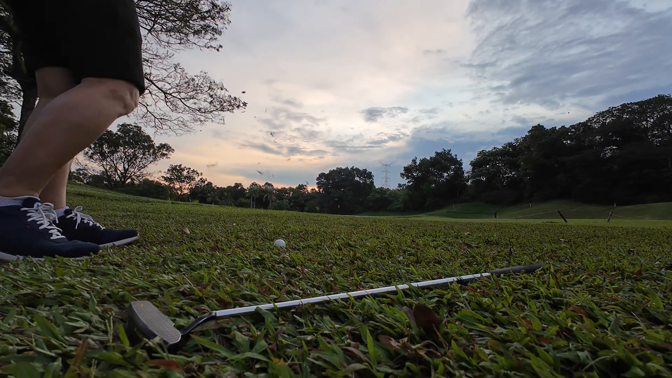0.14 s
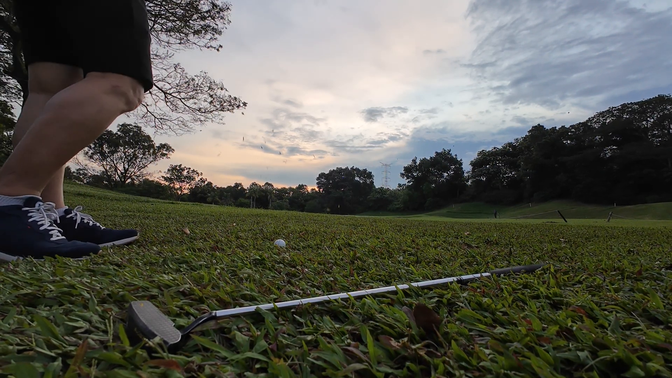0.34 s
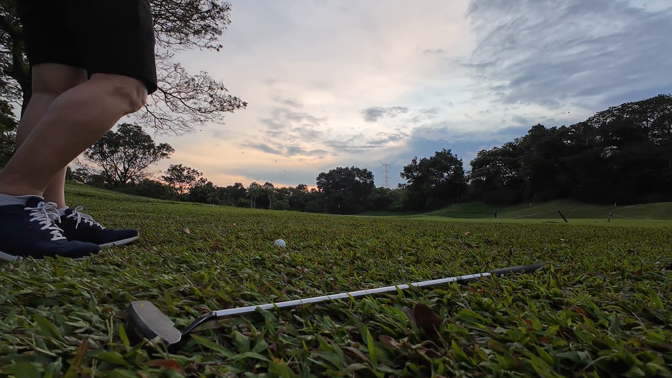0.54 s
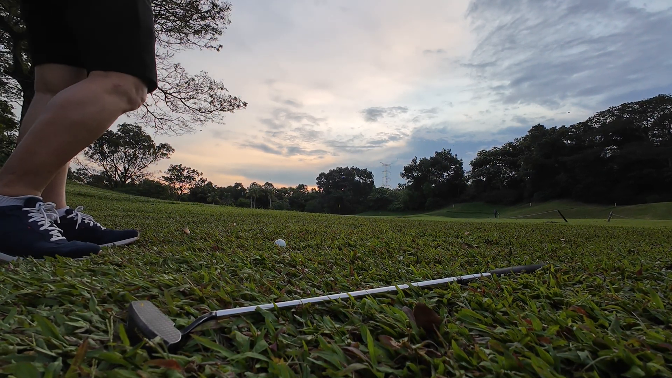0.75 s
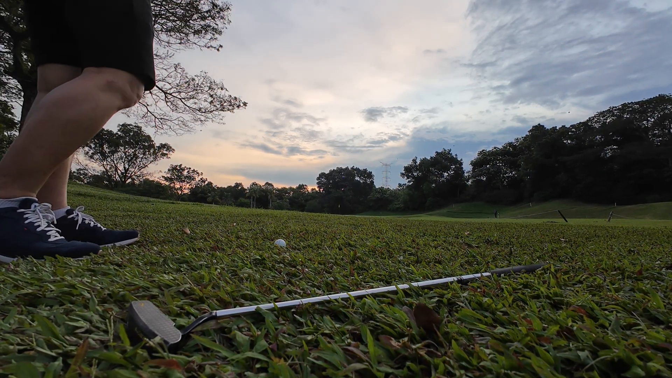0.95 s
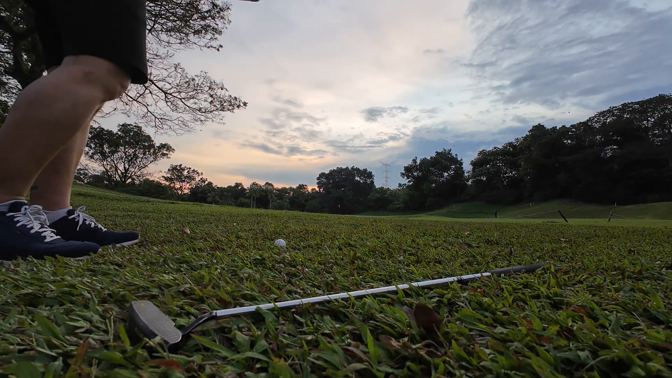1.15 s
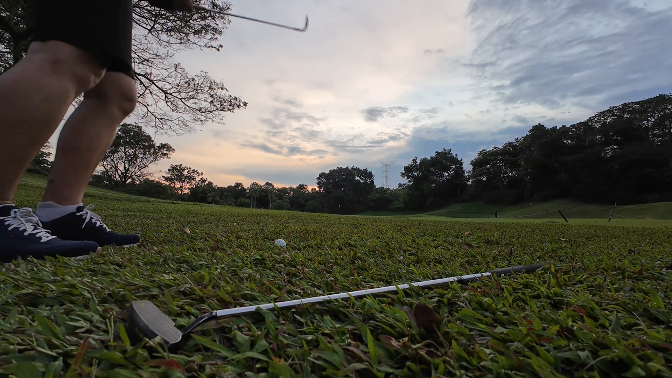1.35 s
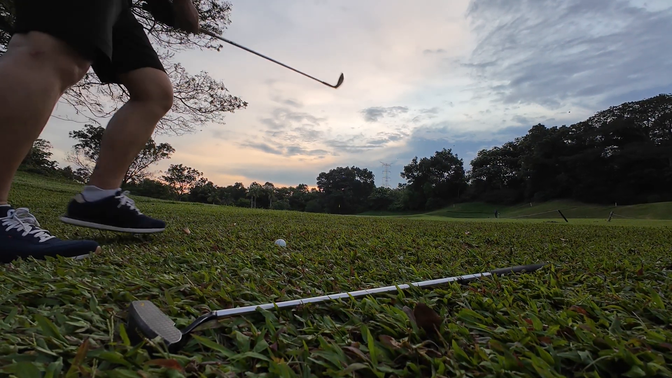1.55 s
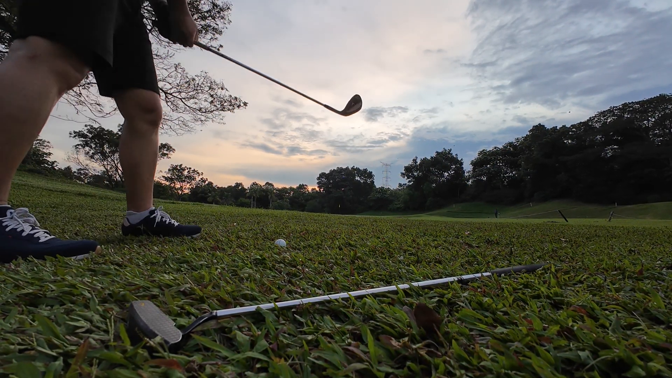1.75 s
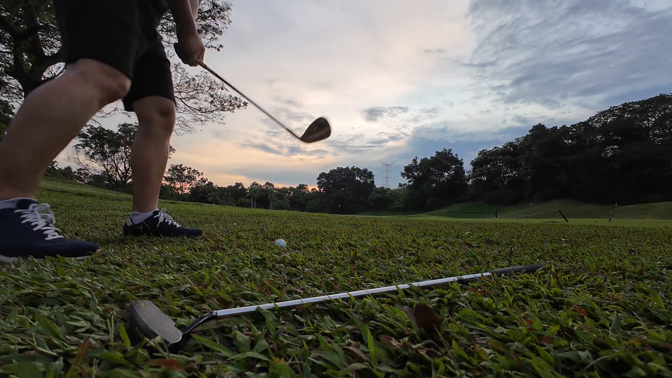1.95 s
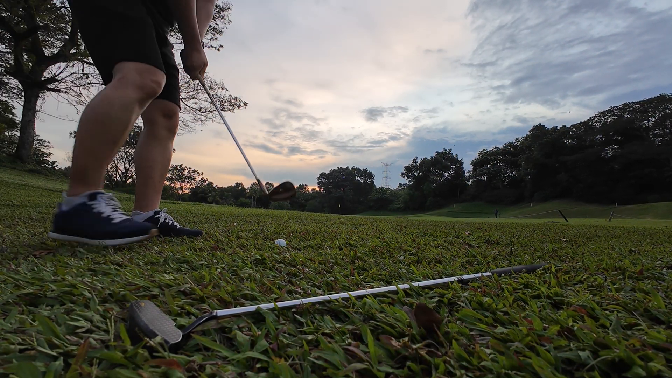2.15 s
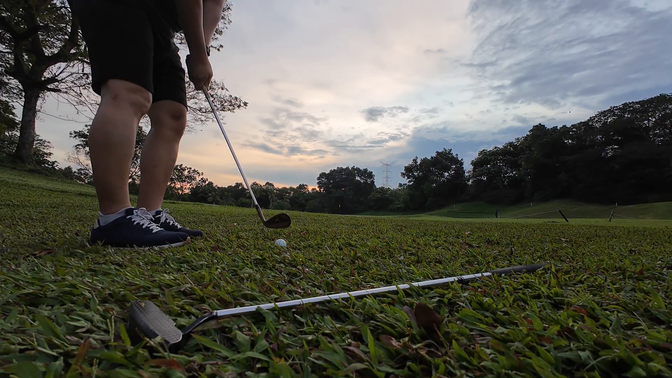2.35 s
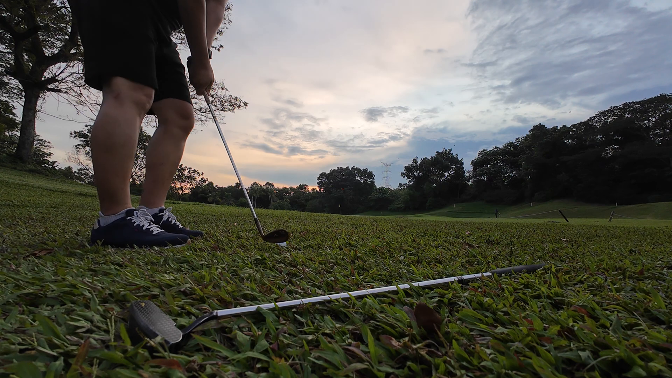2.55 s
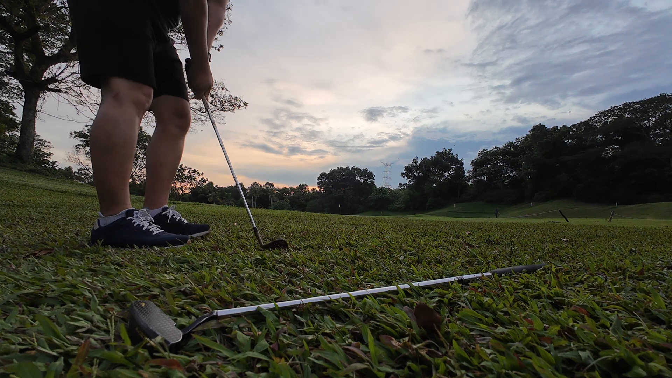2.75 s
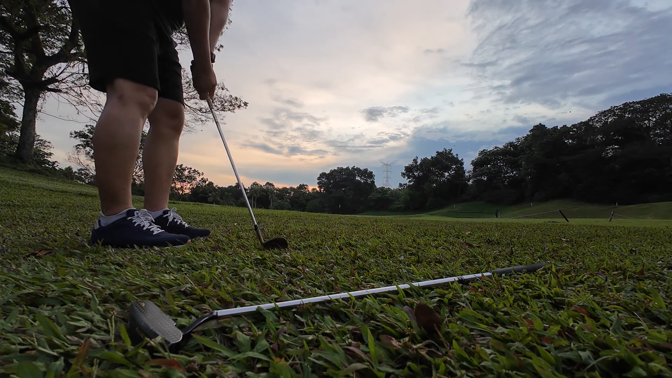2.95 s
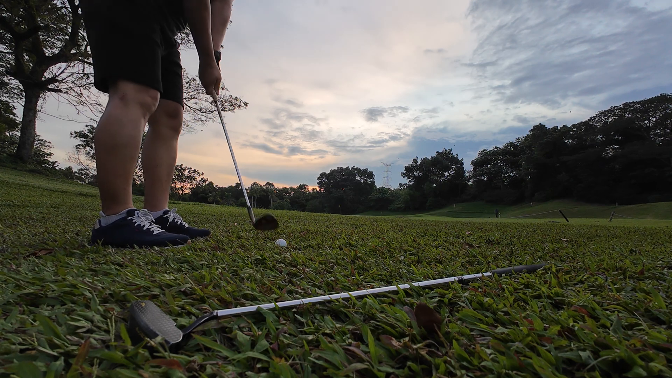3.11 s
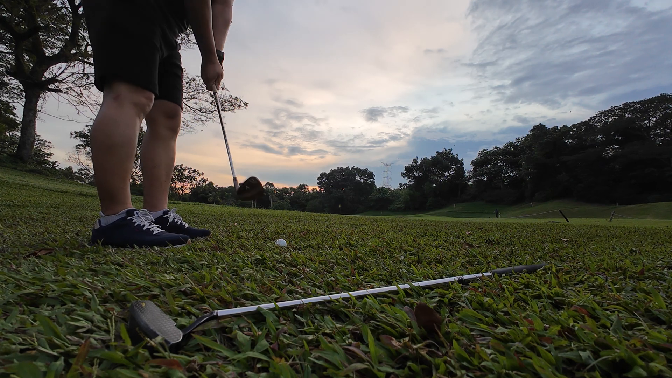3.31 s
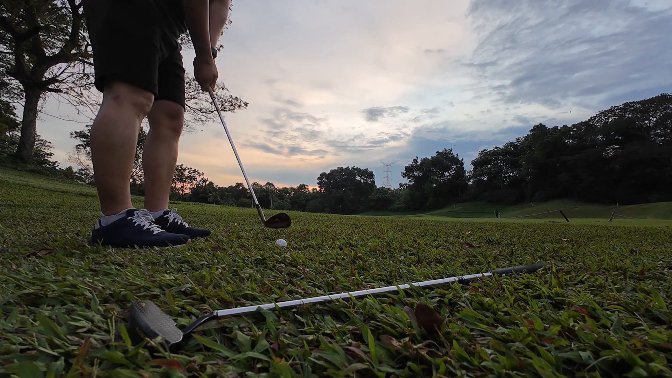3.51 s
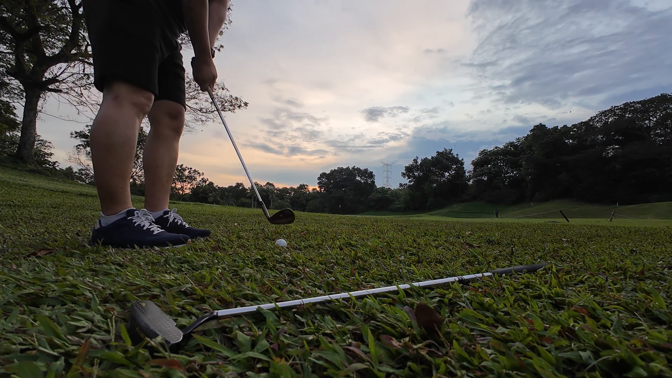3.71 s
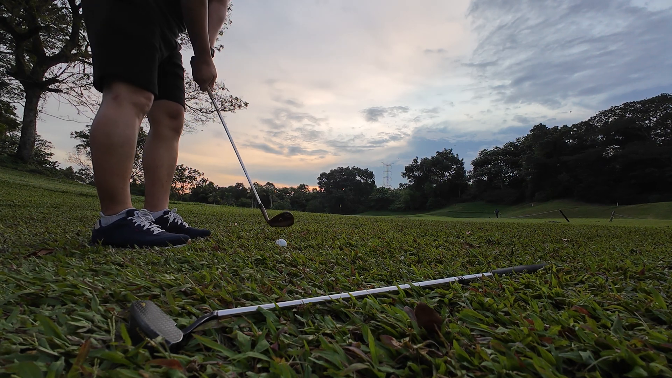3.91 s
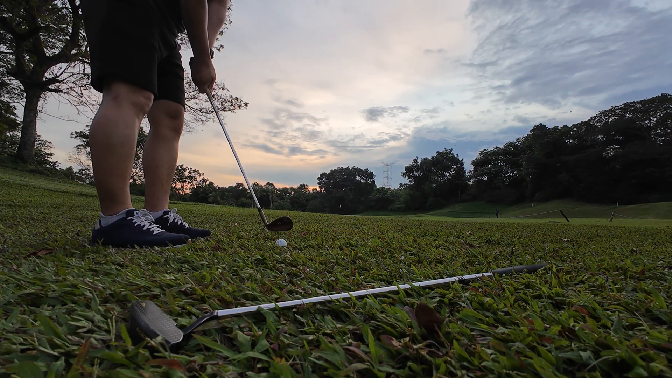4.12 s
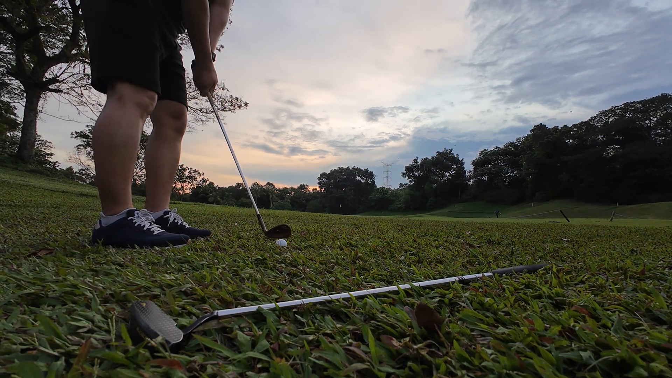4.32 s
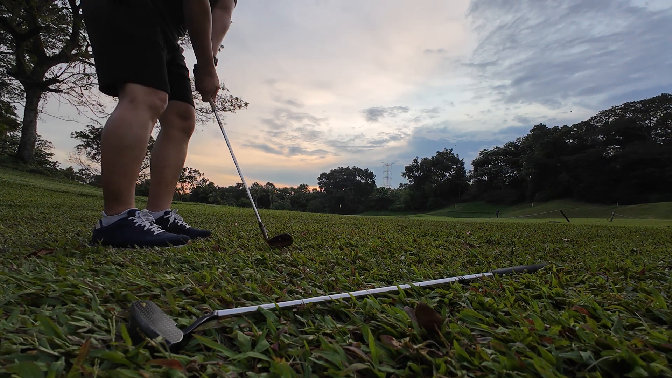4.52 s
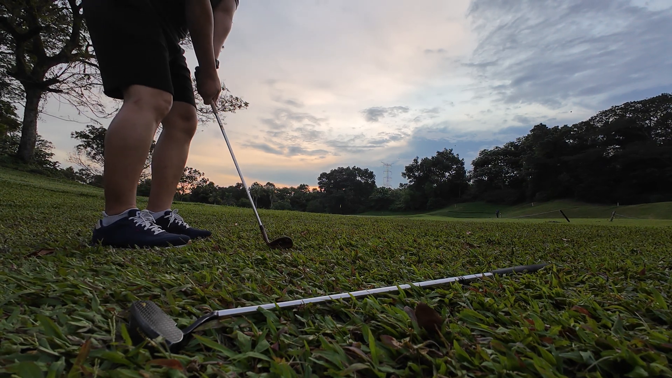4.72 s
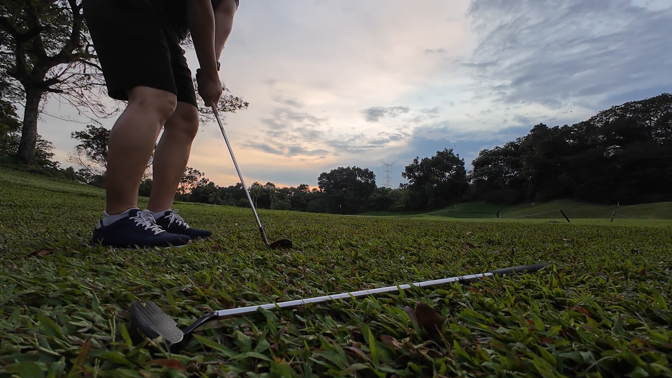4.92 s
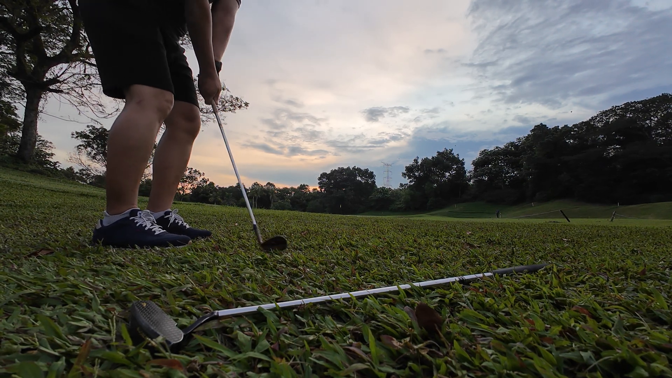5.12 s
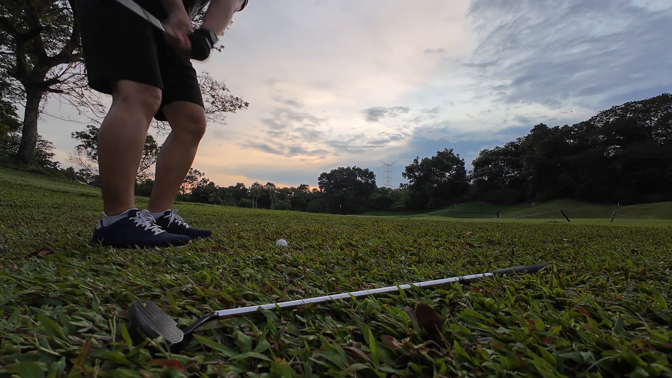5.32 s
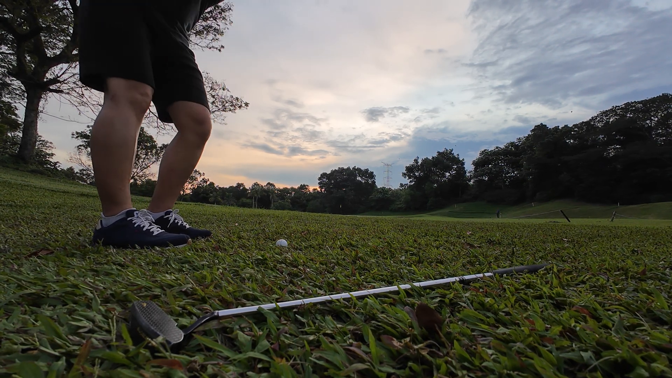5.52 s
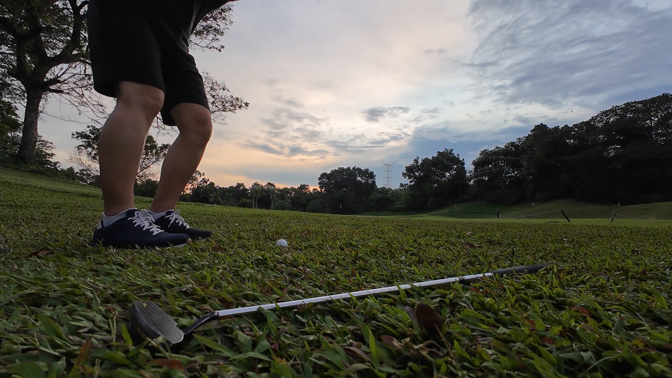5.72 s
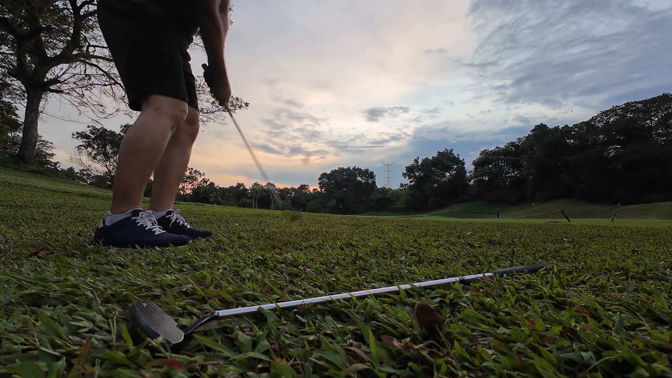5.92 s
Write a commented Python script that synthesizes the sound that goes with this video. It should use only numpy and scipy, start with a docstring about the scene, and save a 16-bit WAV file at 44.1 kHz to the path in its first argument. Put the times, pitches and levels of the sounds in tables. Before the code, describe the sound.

A calm, quiet background of faraway engine hum, high insect hiss and sparse bird whistles, in stereo with birds mostly left. Several muffled steps crunch in grass early on, with tiny stem snaps. After a stretch of birdsong comes a short swish of grass, then almost a second later a sudden club whoosh and hard, dry golf hit, far louder than everything else, with a dull soil thud and brief falling debris.

```python
"""A golfer's iron shot, heard from the grass at dusk: a whoosh, tearing turf, the crack of the ball, flying grass.
The whoosh is a tone and hiss that follow the club's speed; hard blows ring the head; filtered noise makes the turf.
Before it the golfer steps up, grounds the iron and brushes it back: noise bursts for soles, blades and stems.
Birds whistle and chip as gliding tones with an echo from the trees; insects buzz as narrow bands of noise.
Behind them a far engine slowly speeds up, a wavering tone and its octave over a low rumble."""
import sys
import numpy as np
from scipy import signal
from scipy.fft import rfft, irfft, next_fast_len
from scipy.io import wavfile

SR = 44100
rng = np.random.default_rng(int(sys.argv[2]) if len(sys.argv) > 2 else 0)


def output_pcm(signal):
    """Save a mono or channel-first signal as 16-bit PCM at the path in sys.argv[1].

    Samples are clipped to [-1, 1] before scaling.
    """
    pcm = np.clip(np.atleast_2d(signal).T, -1, 1) * 32767
    wavfile.write(sys.argv[1], SR, np.round(pcm).astype(np.int16))


N = 267246
TIME = np.arange(N) / SR   # seconds
CUTOFF_HZ = 15750   # top of the audible band here


def from_db(db):
    """Turn decibels into a gain."""
    return 10 ** (np.asarray(db) / 20)


def rms_one(x):
    """Scale a sound to an average (rms) strength of 1."""
    return x / np.sqrt(np.mean(x ** 2) + 1e-20)


def colour(x, spectrum):
    """Shape a sound by an outline of (pitch_hz, level_db) points, then scale it to rms 1."""
    hz, db = np.transpose(spectrum)
    size = next_fast_len(N)
    log_hz = np.log(np.fft.rfftfreq(size, 1 / SR) + 1)
    # beyond both ends of the outline the level keeps falling
    skirts_db = 20 * np.abs(log_hz - np.clip(log_hz, np.log(hz[0]), np.log(hz[-1])))
    gain = from_db(np.interp(log_hz, np.log(hz), db) - skirts_db)
    return rms_one(irfft(rfft(x, size) * gain, size)[..., :N])


def bandpass(x, low_hz, high_hz):
    """Keep mainly the sound between two pitches."""
    return signal.sosfilt(signal.butter(2, [low_hz, high_hz], "band", fs=SR, output="sos"), x)


def drift(rate):
    """Wander at random with rms 1, through a given number of chance values per second."""
    knots = rng.standard_normal(int(N / SR * rate) + 2)
    return rms_one(np.interp(TIME * rate, np.arange(len(knots)), knots))


def panned(x, pan_db):
    """Make the left louder than the right by pan_db."""
    return x * from_db(np.array([[.5], [-.5]]) * pan_db)


def pair(likeness, pan_db=0):
    """White noise at two microphones: likeness 1 is the same in both, -1 is opposite."""
    mid, side = rng.standard_normal((2, N))
    c = np.clip(likeness, -1, 1)
    both = np.sqrt(1 + c) * mid + np.sqrt(1 - c) * side * [[1], [-1]]
    return panned(both, pan_db) / np.sqrt(2)


def placed(x, pan_db, lead_s):
    """A point source reaches the left microphone lead_s earlier (later if negative)."""
    right = np.interp(TIME - lead_s, TIME, x)
    return panned(np.array([x, right]), pan_db)


def grains(likeness, per_s, spread_db):
    """Noise of uneven strength stands for countless tiny breaks of different sizes."""
    return pair(likeness) * from_db(spread_db * np.clip(drift(per_s), -2, 2))


def burst(start, attack, hold, fall_db_per_s):
    """A loudness that swells, holds, then dies away."""
    age = TIME - start
    return np.clip(age / attack, 0, 1) * from_db(-fall_db_per_s * np.maximum(age - attack - hold, 0))


def traffic(waver_db=2.2, patchy_db=0.6, octave_db=-22, gust_db=0.9):
    """Rumble, exhaust drone and tyre roar from afar, with one engine's firing tone wavering in the air."""
    # noise outlines: pitch_hz, level_db (per Hz, shape only)
    rumble_outline = [(20,-8.5),(40,-9),(65,1.5),(85,-3.5),(110,-9.5),(135,-8.5),(170,-15.5),(260,-40.5)]
    drone_outline = [(120,-7),(170,0.5),(240,-0.5),(330,-4.5),(420,-9.5),(520,-11),(800,-40)]
    roar_outline = [(350,-12),(500,-2),(620,2.5),(790,-5),(1000,-15.5),(1400,-24),(2500,-34)]
    # moments when the traffic surges: peak_s (middle of the swell), rumble_gain_db, roar_gain_db
    surges = [(.85,1,3),(1.35,2,-1.5),(2.27,1,2),(3.571,5,0),(5.19,6,2.5)]
    surge_s = 0.15
    # the engine nears its top firing rate, and fades ever faster as it drives off
    start_hz, top_hz, speedup_s = 106, 137.5, 5.2
    engine_db, fade_db_per_s, gone_s = -38, 1.8, 5.0
    # the drone and the tyre roar recede slowly
    rumble_db, exhaust_db, tyre_db, recede_db_per_s = -41.7, -47, -59.7, 0.45

    hz = top_hz + (start_hz - top_hz) * np.exp(-TIME / speedup_s)
    tone_db = engine_db - fade_db_per_s * TIME - 20 * np.log10(1 + (TIME / gone_s) ** 10)
    receding_db = -recede_db_per_s * TIME
    low_db = rumble_db + gust_db * drift(7)
    roar_db = tyre_db + receding_db
    for s, rumble_gain_db, roar_gain_db in surges:
        swell = np.exp(-((TIME - s) / surge_s) ** 2)
        low_db = low_db + rumble_gain_db * swell
        roar_db = roar_db + roar_gain_db * swell

    phase = 2 * np.pi * np.cumsum(hz + 1.27 * drift(11)) / SR
    engine = np.sin(phase) + from_db(octave_db + 3.55 * drift(5.7)) * np.sin(2 * phase)
    engine = np.sqrt(2) * engine * from_db(tone_db + waver_db * drift(10))
    rumble = from_db(low_db) * colour(pair(0.97), rumble_outline)
    drone_db = exhaust_db + receding_db + patchy_db * drift(12)
    drone = from_db(drone_db) * colour(pair(0.98), drone_outline)
    roar = from_db(roar_db) * colour(pair(0.94), roar_outline)
    return panned(engine + rumble + drone + roar, pan_db=0.65)


def insects(throb_db=1.3):
    """Many buzzers blur into a narrow band of noise for each kind, over a faint airy hiss."""
    # outline of the airy hiss: pitch_hz, level_db (per Hz, shape only)
    air_outline = [(500,12),(1300,2),(2000,-0.5),(3000,-0.5),(4300,-9.5),(6000,-6),(8500,-41),(12000,-25),(16000,-28)]
    # insect choruses: pitch_hz, width_hz, level_db, left-right likeness (-1 to 1), pan_db
    choruses = [(3620,680,-80,0.15,4.5),(4980,750,-77,0.16,4),(6397,255,-68.5,-0.033,1),(6830,500,-71.5,-0.23,-0.5),(7680,190,-73.5,-0.34,-2.5),
                (8030,85,-76.5,-0.13,0),(9800,970,-78.5,-0.63,0.5),(10530,670,-74,-0.59,-6),(13120,690,-78.5,-0.66,3)]
    out = from_db(-70.5) * colour(pair(0.59), air_outline)
    for hz, width, db, likeness, pan_db in choruses:
        buzz = bandpass(pair(likeness, pan_db), hz - width / 2, hz + width / 2)
        out += from_db(db + throb_db * drift(20)) * rms_one(buzz)
    return out


def faint_calls_and_echoes(blur=0.023, flutter_db=5.5):
    """Faint far bird calls and lingering echoes of nearer birds, as narrow fluttering bands of noise."""
    # faint calls and echoes: start_s, level_db (before swell and flutter), length_s, pitch_hz
    faint_sounds = [(0.25,-73,0.55,5100),(.75,-77,.35,5000),(1.262,-70,0.048,5000),(2.19,-79,0.55,2280),(3.362,-75.5,0.77,3800),(4.55,-76,0.32,5330),(5.27,-76,.28,5170),(5.99,-59.5,.065,5600)]
    out, air = np.zeros((2, N)), pair(0.35, pan_db=4.5)
    for s, db, length, hz in faint_sounds:
        band = rms_one(bandpass(air, hz * (1 - blur), hz * (1 + blur)))
        swell = np.sqrt(np.abs(np.sin(np.pi * np.clip((TIME - s) / length, 0, 1))))
        out += from_db(db) * swell * band
    return out * from_db(flutter_db * drift(40))


def trees(x, t60=0.34, first_s=.02, leaves=0.11, trunks=0.64):
    """An echo from the tree line and a thin scatter from trunks and leaves."""
    age = TIME[:SR // 2]
    scatter = rng.standard_normal((2, len(age))) * from_db(-60 * age / t60) * (age > .006)
    response = leaves * scatter * np.sqrt(4000 / SR)
    response[:, int(first_s * SR)] += trunks
    return signal.fftconvolve(x[None], response, axes=1)[:, :N]


def phrases(calls, first_length, second_length, first_pitch, second_db, first_echo, second_echo):
    """A light, slightly flat first note, then a fuller one that carries further into the trees."""
    notes = []
    for s, db, *gaps in calls:
        notes.append((s, db, first_length, first_pitch, first_echo))
        for gap in gaps:
            notes.append((s + gap, db + second_db, second_length, 1, second_echo))
    return notes


def chips(stretch=1.54, echo=0.61):
    """The lower a chip, the longer it lasts."""
    # the second bird's chips: start_s, level_db (before the note's own levels), pitch ratio
    chip_calls = [(1.815,-66.5,0.98),(2.078,-55.5,1),(2.348,-58,0.97),(2.587,-64,0.8),(2.633,-54,1),
                  (2.825,-63.5,1.07),(2.873,-63,.88),(2.936,-60.5,0.98),(3.172,-69,0.99)]
    return [(s, db, pitch ** -stretch, pitch, echo) for s, db, pitch in chip_calls]


def bird(note, calls, pan_db, lead_s, waver=0.0114, flutter_db=3.5):
    """A near-pure whistle repeats one gesture, a little different each time."""
    s, hz, db = np.transpose(note)
    direct, far = np.zeros((2, N))
    wobble, flutter = 1 + waver * drift(250), flutter_db * drift(130)
    # length and pitch are ratios that stretch and shift the note
    for start, level_db, length, pitch, echo in calls:
        on = (TIME > start) & (TIME < start + s[-1] * length)
        age = (TIME[on] - start) / length
        phase = 2 * np.pi * np.cumsum(pitch * np.interp(age, s, hz) * wobble[on]) / SR
        loudness = from_db(level_db + np.interp(age, s, db) + flutter[on])
        call = np.sin(phase) * loudness * signal.windows.tukey(len(age), .1)
        direct[on] += call
        far[on] += echo * call
    return placed(direct, pan_db, lead_s) + trees(far)


def press(start, length, attack_s=.03, release_s=.02):
    """Weight comes onto a sole, stays, and eases off."""
    age = TIME - start
    return np.clip(age / attack_s, 0, 1) * np.exp(-np.maximum(age - length + release_s, 0) / release_s)


def footwork(snap_t60=0.0049, clump_db=3.0):
    """Soles crush the turf in clumps, blades brush along shoe and club, and a few stems snap."""
    # noise outlines: pitch_hz, level_db (per Hz, shape only)
    crunch_outline = [(250,-7),(600,5),(1200,3),(1900,-2),(2700,-16),(5000,-16.5),(8000,-19),(16000,-47)]
    swish_outline = [(1500,-27),(4000,-25),(7500,0.5),(10500,4),(13500,4),(16000,-8)]
    # shoes press the turf: start_s, length_s, crunch_db, swish_db (blades)
    steps = [(1.53,.115,-62,-60),(1.72,.125,-56.5,-62.5),(1.998,.1,-52.5,-69),(2.09,.095,-56.5,-61.5),(2.28,.09,-57.5,-69)]
    # the club head brushes the grass: peak_s, fade_s (of the power, each side), swish_db, crunch_db
    brushes = [(2.796,0.11,-68,-67.5),(5.173,.016,-51,-64)]
    # snapping stems and small knocks: start_s, peak_db, pitch_hz (middle of the band)
    snap_list = [(.303,-46,10500),(2.002,-38,1450),(2.021,-43,1900),(2.057,-42,1150),(2.114,-46,1100),(3.021,-49,1400)]
    swish_lag_s = .015
    snap_width = .45   # natural-log pitch steps to either side

    crunch_power, swish_power, snaps = np.zeros((3, N))
    for s, length, crunch_db, swish_db in steps:
        crunch_power += (press(s, length) * from_db(crunch_db)) ** 2
        swish_power += (press(s + swish_lag_s, length) * from_db(swish_db)) ** 2
    for s, fade, swish_db, crunch_db in brushes:
        stroke = np.exp(-np.abs(TIME - s) / fade)
        crunch_power += stroke * from_db(crunch_db) ** 2
        swish_power += stroke * from_db(swish_db) ** 2
    for s, db, hz in snap_list:
        snap = rng.standard_normal(SR // 20) * from_db(-60 * TIME[:SR // 20] / snap_t60)
        snap = bandpass(snap, hz * np.exp(-snap_width), min(hz * np.exp(snap_width), CUTOFF_HZ))
        snaps[int(s * SR):int(s * SR) + len(snap)] += from_db(db) * snap / np.abs(snap).max()

    clumps = grains(0.94, per_s=400, spread_db=1.0) * from_db(clump_db * drift(90))
    crunch = np.sqrt(crunch_power) * colour(clumps, crunch_outline)
    swish = np.sqrt(swish_power) * colour(grains(-0.55, per_s=900, spread_db=3.5), swish_outline)
    return crunch + swish + snaps


def whoosh(rough_db=2.5, speed_power=3):
    """The shaft sheds vortices at a pitch that follows its speed; the head hisses; both grow with nearness."""
    # outline of the head's hiss: pitch_hz, level_db (per Hz, shape only)
    hiss_outline = [(300,-14),(700,7),(1500,-1),(2300,-1.5),(3800,-2),(5000,-8),(8000,-14),(16000,-26)]
    pass_s, speedup_s, slowdown_s = 5.941, .11, .15
    whistle_hz, whistle_db, hiss_db = 317.3, -34, -46   # at full speed, before waver and roughness
    shaft_near_s, head_near_s = .018, .009   # how long each stays close

    since = TIME - pass_s
    speed = np.exp(-(since / np.where(since < 0, speedup_s, slowdown_s)) ** 2)   # 1 at its fastest
    phase = 2 * np.pi * np.cumsum(whistle_hz * speed * (1 + .08 * drift(200))) / SR
    whistle = np.sin(phase) * from_db(whistle_db + rough_db * drift(120))
    whistle = whistle / np.hypot(1, since / shaft_near_s)
    hiss = from_db(hiss_db) * colour(pair(0.95), hiss_outline) / np.hypot(1, since / head_near_s)
    return speed ** speed_power * (whistle + hiss)


def ring(since, hz, t60):
    """One ringing tone of a struck body, falling 60 dB in t60 seconds."""
    age = np.maximum(since, 0)
    return np.sin(2 * np.pi * hz * age) * from_db(-60 * age / t60)


def strike(contact_s=0.00013):
    """Roots tear and soil thuds while hard blows crack and set head and ball ringing; then grass rains down."""
    # noise outlines: pitch_hz, level_db (per Hz, shape only)
    soil_outline = [(60,-16),(140,-5.5),(270,4),(420,-3),(660,0),(1200,-5),(1900,-7),(3000,-23),(6000,-41)]
    tearing_outline = [(800,-47),(2500,6.5),(4500,-0.5),(6500,0),(8000,4),(11000,-1),(13500,5),(16000,-6)]
    # roots rip as the sole enters and again as the divot comes free: start_s, level_db
    rips = [(5.9603,-15.5),(5.9765,-32)]
    # a low crack, a brighter harder one, then a weaker one, each ringing the head:
    # start_s, ring_db (added to each tone's level), crack_db, crack_hz, crack_rise_s
    blows = [(5.9656,-7,-1.5,1370,0.00019),(5.9675,-1,2.5,1980,0.00039),(5.9691,-13,-6,1620,0.00087)]
    # ringing tones of head and ball: pitch_hz, level_db (before the blow's ring_db), t60_s
    club_tones = [(300,-27,.05),(490,-24,.035),(790,-23,.035),(1095,-22,.04),(1310,-22,.035),(1595,-19,.03),(2270,-18,.035),(2806,-20,.03),(3932,-27,.035),(5455,-30,.04)]
    divot_s = 5.9603   # the sole enters the turf
    soil_db, tear_fall, patter_db = -19.5, 1150, -59.5   # tear_fall in dB per second
    clods_db = -58   # crumbs of soil fall with the grass

    thud = from_db(soil_db) * burst(divot_s, attack=.008, hold=.006, fall_db_per_s=1100)
    tear = sum(from_db(db) * burst(s, .005, .0005, tear_fall) for s, db in rips)
    patter = burst(divot_s, attack=0.029, hold=.08, fall_db_per_s=100)
    soil = np.hypot(thud, from_db(clods_db) * patter) * colour(pair(1.0, pan_db=0.3), soil_outline)
    shreds = colour(grains(0.7, per_s=1100, spread_db=2.0), tearing_outline)
    tearing = np.hypot(tear, from_db(patter_db) * patter) * shreds

    clack = np.zeros(N)
    for s, ring_db, crack_db, crack_hz, rise in blows:
        on = TIME >= s
        age = TIME[on] - s
        modes = sum(from_db(db) * ring(age, hz, t60) for hz, db, t60 in club_tones)
        # the contact force swells and collapses within a few cycles
        force = (age / rise) ** 2 * np.exp(2 - 2 * age / rise)
        crack = from_db(crack_db) * force * np.sin(2 * np.pi * crack_hz * age)
        clack[on] -= crack + from_db(ring_db) * modes * (1 - np.exp(-age / contact_s))
    return soil + panned(tearing, pan_db=0.5) + placed(clack, pan_db=1.0, lead_s=.000015)


def scene():
    """Everything that sounds on the fairway."""
    # bird notes, before each call shifts them: start_s (from the note's start), pitch_hz, level_db
    rise_note = [(0,4450,-13),(.02,4700,-2),(.05,5150,0),(.075,5700,-1),(.1,6100,-12)]
    fall_note = [(0,5180,-18),(.015,5130,5.5),(.033,4550,-4.5),(.052,3740,-1.5),(.08,3300,-14),(.12,2940,-27)]
    chip_note = [(0,2825,-21),(.012,2443,4.5),(.024,2250,-3.5),(.036,2400,-4.5),(.055,2800,-13)]
    # the whistler's calls: start_s, level_db (before the note's own), gap_s to a second note if any
    rise_calls = [(2.173,-67,.164),(3.139,-60.5,0.094),(4.222,-66,.078),(5.359,-64)]
    fall_calls = [(0.263,-66.5),(1.675,-71.5,0.099),(2.642,-67.5,0.1152),(3.600,-66,.152),(4.786,-67),(6.5,-64.5)]
    rises = phrases(rise_calls, first_length=.95, second_length=.97, first_pitch=.97, second_db=5,
                    first_echo=0.29, second_echo=.85)
    falls = phrases(fall_calls, first_length=0.93, second_length=.96, first_pitch=.98, second_db=3.5,
                    first_echo=.45, second_echo=.95)
    whistlers = bird(rise_note, rises, pan_db=7.5, lead_s=.00004)
    whistlers = whistlers + bird(fall_note, falls, pan_db=7, lead_s=.00004)
    chipper = bird(chip_note, chips(), pan_db=2.0, lead_s=-0.000032, waver=0.021, flutter_db=5.0)
    birds = from_db(1) * whistlers + from_db(-.5) * chipper + faint_calls_and_echoes()
    return traffic() + insects() + birds + footwork() + whoosh() + strike()


def record(dry):
    """The loudest peaks are flattened just under full scale and the top is cut."""
    rounded = dry / (1 + (dry / .93) ** 6) ** (1 / 6)
    return signal.sosfilt(signal.ellip(10, .1, 90, CUTOFF_HZ, fs=SR, output="sos"), rounded)


dry = scene()
out = record(dry)
output_pcm(out)
```